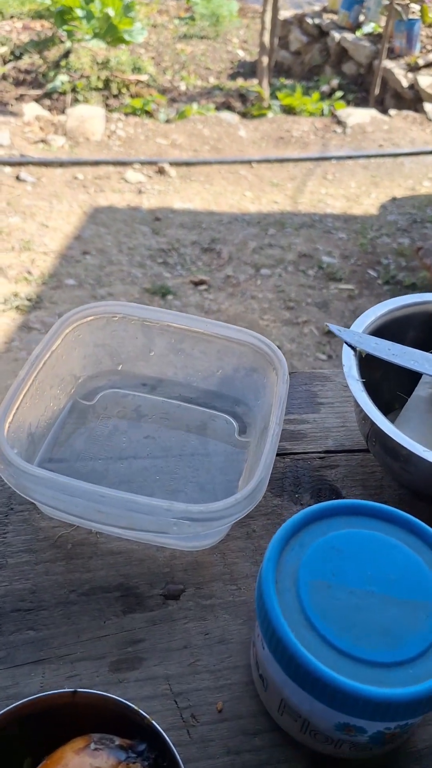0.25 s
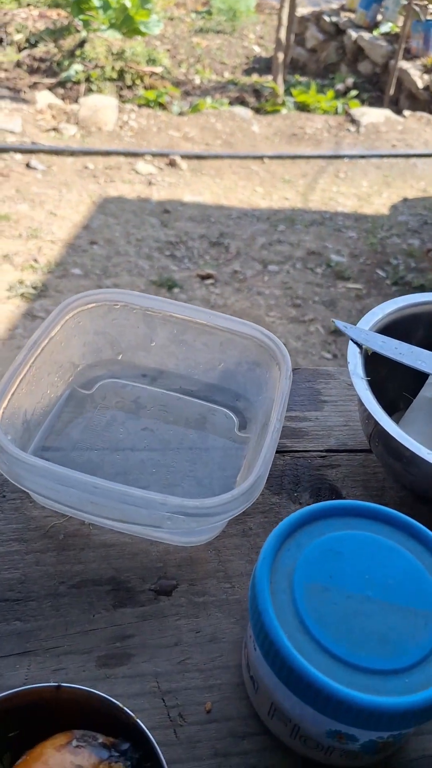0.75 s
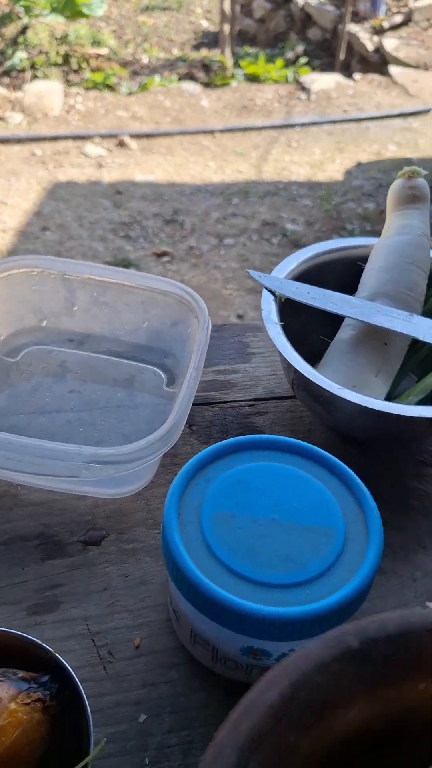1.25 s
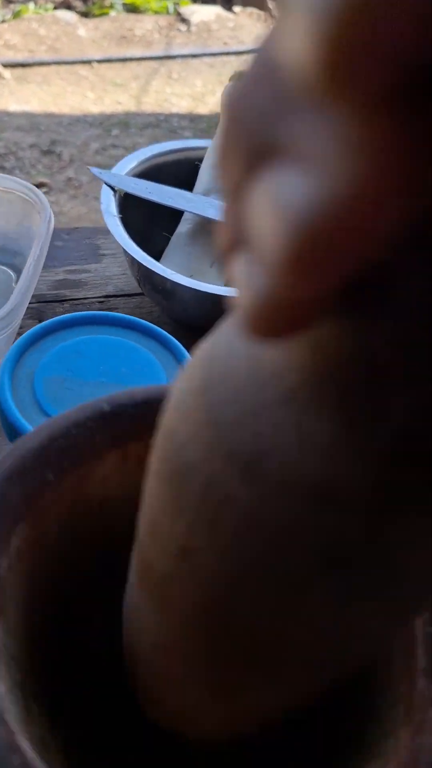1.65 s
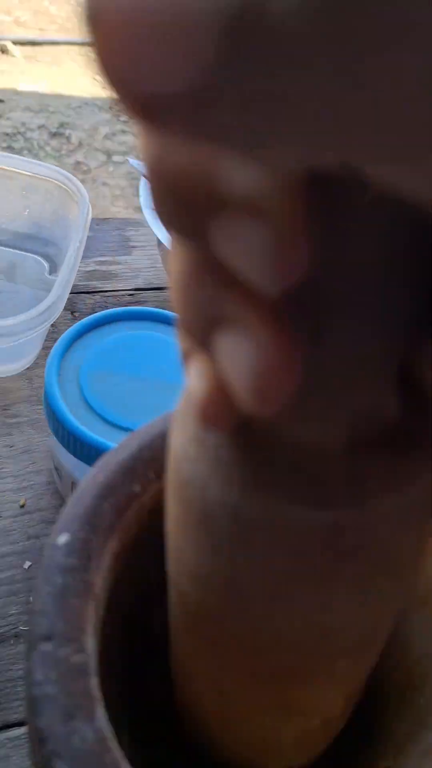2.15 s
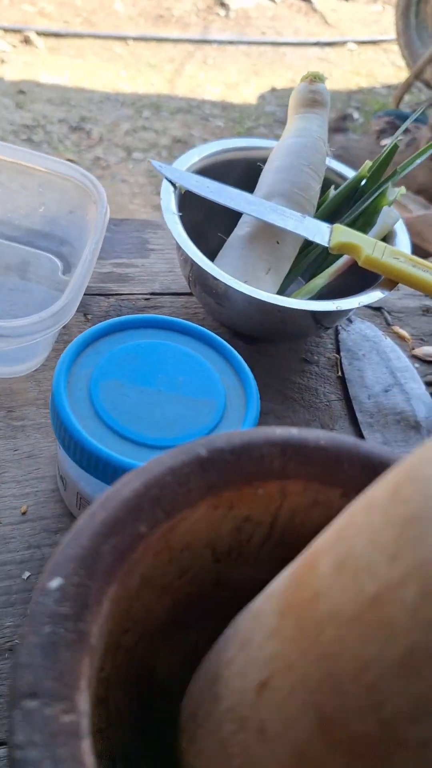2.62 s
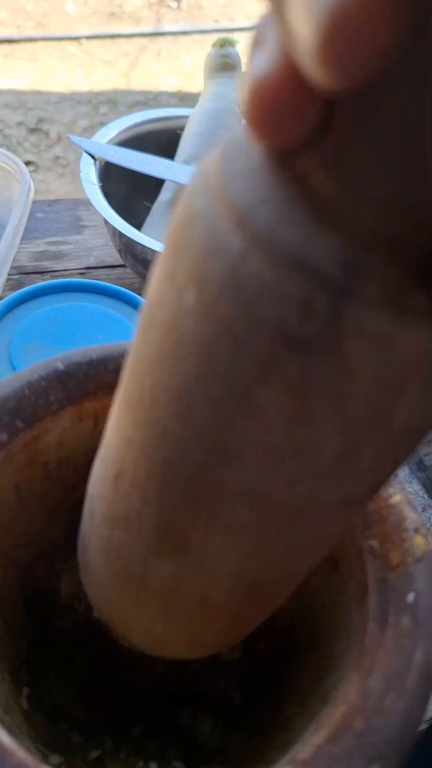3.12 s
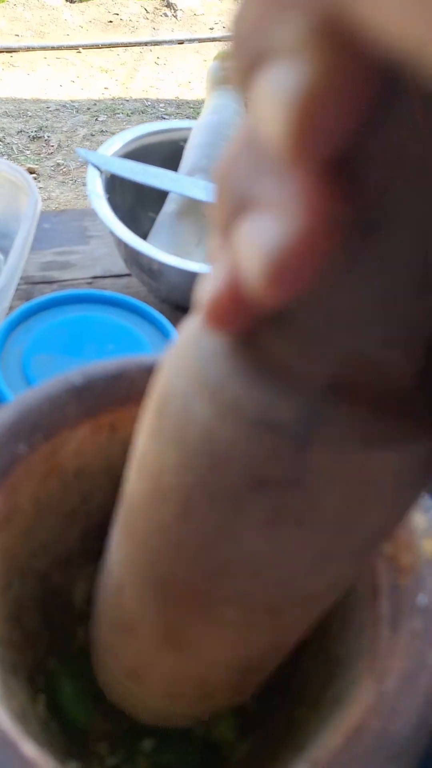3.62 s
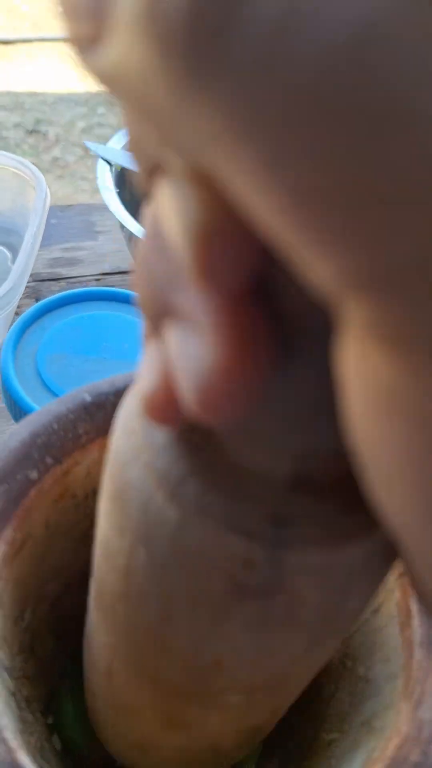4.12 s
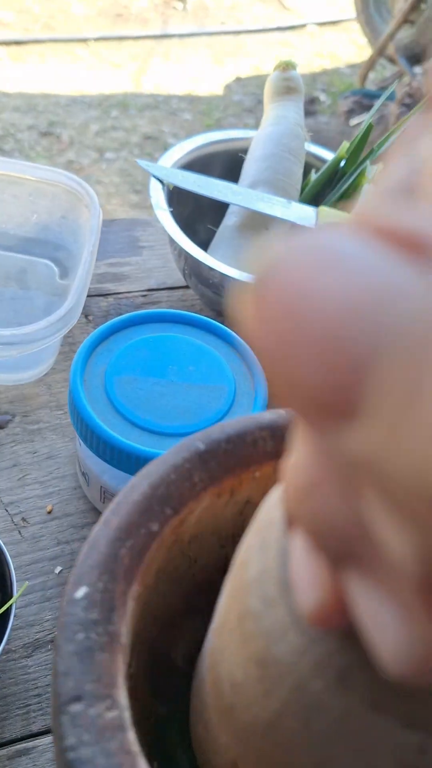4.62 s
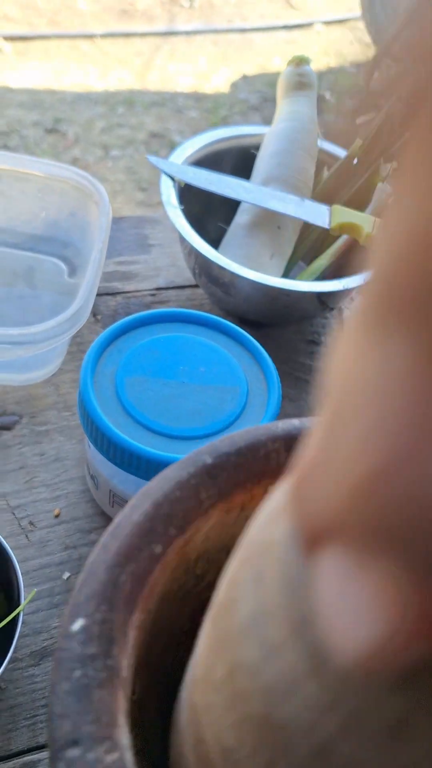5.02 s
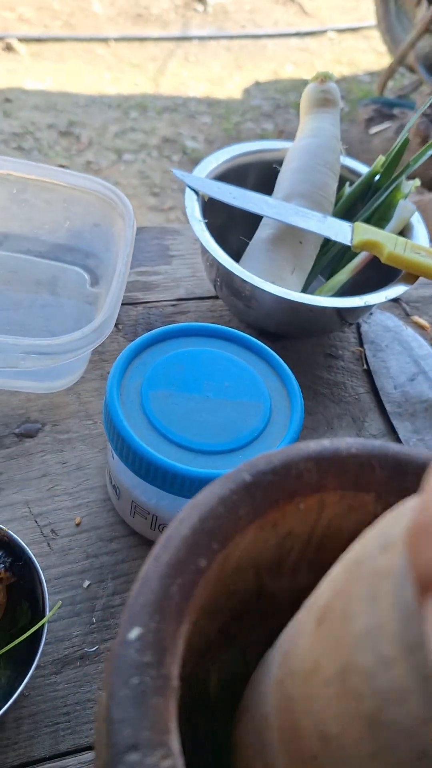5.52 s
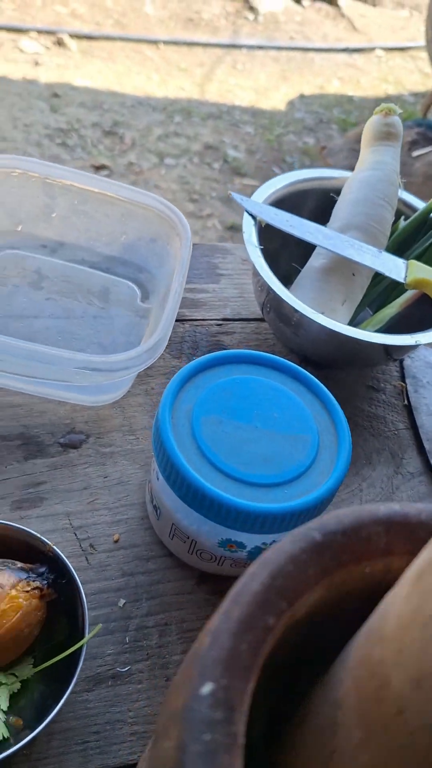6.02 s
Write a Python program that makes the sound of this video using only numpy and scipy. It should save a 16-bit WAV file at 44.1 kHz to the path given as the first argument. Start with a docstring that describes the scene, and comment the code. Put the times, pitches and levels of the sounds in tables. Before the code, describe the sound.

A wooden pestle pounds leaves in a wooden mortar on a plank table, steady crunchy thumps about every 0.4 seconds, outdoors, close up.

```python
"""A wooden pestle pounds leaves in a wooden mortar on a plank table under an outdoor shelter.
Each stroke crunches the leaves (sprays of noise grains) and thumps mortar and table (decaying wood modes).
Where the cushion is thin, wood meets wood: the hollow pops, and the shaft rings there and on wall or rim taps.
Dishes clatter, drags stick and slip, and the shelter answers with scattered echoes of filtered noise.
Behind lie outdoor rumble and hiss, and later a faint far whirr, all coloured noise."""
import sys
import numpy as np
from scipy import signal
from scipy.fft import rfft, irfft, next_fast_len
from scipy.io import wavfile

SR = 44100
rng = np.random.default_rng(int(sys.argv[2]) if len(sys.argv) > 2 else 0)


def int16_out(signal):
    """Quantize to a 16-bit WAV file."""
    q = np.round(np.clip(np.atleast_2d(signal).T, -1, 1) * 32767)
    wavfile.write(sys.argv[1], SR, q.astype(np.int16))


N = 275869
TIME = np.arange(N) / SR


def from_db(db):
    """Decibels to gain."""
    return 10 ** (np.asarray(db) / 20)


def at_hz(points, hz, column=1):
    """Read one column of a table along log frequency."""
    points = np.array(points)
    return np.interp(np.log(np.maximum(hz, 1)), np.log(points[:, 0]), points[:, column])


def add(track, s, sound):
    """Lay a stereo sound into the track at time s."""
    start = round(s * SR)
    track[:, start:start + sound.shape[1]] += sound[:, :N - start]


def noise(colour, alike):
    """Coloured stereo noise of rms 1 with a given left-right likeness."""
    size = next_fast_len(N, True)
    gain = from_db(at_hz(colour, np.fft.rfftfreq(size, 1 / SR)))
    spectra = rfft(rng.standard_normal((2, size))) * gain
    mid, side = irfft(spectra, size)[:, :N]
    alike = np.clip(alike, -1, 1)
    both = np.sqrt(1 + alike) * mid + np.sqrt(1 - alike) * side * np.array([[1], [-1]])
    return both / both.std()


def soften(ring, hardness_hz):
    """A soft contact rounds off the high modes: two equal one-pole low-passes."""
    r = np.exp(-2 * np.pi * hardness_hz / SR)
    return signal.lfilter([(1 - r) ** 2], [1, -2 * r, r * r], ring)


def strike(modes, spread, tilt_db=0, size=8000):
    """One blow rings every mode, each a little different in strength and pitch from blow to blow."""
    hz, db, t60, pan = np.array(modes).T[:, :, None]
    t, sides = TIME[:size], np.array([.5, -.5])[:, None, None]
    strength_db = 1.8 * rng.standard_normal(hz.shape)
    stretch = 1 + .01 * rng.standard_normal(hz.shape)
    # the tilt, in dB per octave, pivots on the strongest mode
    octaves = np.log2(hz / hz[db.argmax()])
    gain = from_db(db + strength_db + tilt_db * octaves + sides * pan)
    # neighbouring modes swing in opposite directions
    sign = (-1) ** np.arange(len(hz))[:, None]
    # high modes reach the two microphones further out of step
    phase = -sides * spread * np.sqrt(hz / hz.mean())
    cycles = hz * stretch * t
    # each ring builds up over its first cycle
    envelope = (1 - np.exp(-2 * cycles)) * from_db(-60 * t / t60)
    return (sign * gain * envelope * np.sin(2 * np.pi * cycles + phase)).sum(axis=1)


def flurry(envelope, clicks_per_s):
    """Tiny uneven contacts under an envelope; total energy 1."""
    size = len(envelope)
    hits = rng.random(size) < clicks_per_s / SR
    clicks = hits * rng.standard_normal(size) * envelope
    return clicks[None] / (np.linalg.norm(clicks) + 1e-9)


# colour of the low outdoor air: pitch_hz [Hz], level_db [dB per Hz]
RUMBLE = [(15, -23), (25, -3.5), (60, 0.5), (86, 2.5), (123, -0.5), (240, -11), (381, -3), (444, -11),
          (510, -11), (796, -27.5), (1160, -30), (1290, -19.5), (1500, -40), (1950, -70.5), (3300, -120)]
# colour of the thin outdoor air: pitch_hz [Hz], level_db [dB per Hz]
HISS = [(880, -39), (1500, -5.5), (1760, -12.5), (2100, -1.5), (2560, -10), (3220, -1), (5880, -1),
        (7610, 1), (9370, -5), (14600, -3), (16000, -27)]
# level of the outdoor air, before the overall rumble and hiss gains; the hiss dips after some loud knocks:
# time_s [s], rumble_db [dB], hiss_db [dB]
AIR = [(0.0, -50.5, -63), (0.31, -58.5, -63.5), (0.73, -58, -66.5), (1.71, -56.5, -64), (2.18, -57.5, -68),
       (2.39, -53, -62), (2.68, -59, -67.5), (2.98, -60, -65.5), (3.15, -62, -72), (5.4, -57, -69),
       (5.98, -57.5, -66.5), (6.26, -52.5, -66.5)]


def air(rumble_gain_db=0.66, hiss_gain_db=3.0):
    """A low outdoor rumble and a thin hiss, two bands of noise whose levels follow a table."""
    s, rumble_db, hiss_db = np.transpose(AIR)
    rumble_level = from_db(np.interp(TIME, s, rumble_db) + rumble_gain_db)
    hiss_level = from_db(np.interp(TIME, s, hiss_db) + hiss_gain_db)
    return rumble_level * noise(RUMBLE, alike=0.6) + hiss_level * noise(HISS, alike=0.15)


# strokes of the pestle: first_touch_s [s], crunch_db [dB], crunch_t60_s [s], sink_s [s], mortar_db [dB],
# hardness_hz [Hz], table_db [dB], hop_s [s], hop_db [dB], dishes_db [dB]
STROKES = [(.09, -12, 0.018, .002, -17, 350, -10, 0.029, -15.5, -35),
           (0.5363, -14, 0.021, .002, -6, 403, -8.5, .018, -18, -30),
           (.961, -16, 0.023, .002, -28, 300, -10.5, 0.033, -24.5, -32.5),
           (1.391, -27, .12, 0.006, -2, 344, -5.5, 0.029, -16.5, -22),
           (1.8054, -23.5, 0.03, 0.0016, -5.5, 302, -11, .015, -18, -31.5),
           (2.182, -33, 0.064, 0.0018, -14.5, 430, -15, .022, -20, -35),
           (2.99, -23.5, 0.013, 0.0019, -10, 219.3, -22.5, 0.019, -25.5, -40.5),
           (3.386, -20.5, 0.017, 0.0063, -17.5, 452, -12, 0.022, -32.5, -41.5),
           (3.76, -24, 0.026, 0.0014, -10, 550, -12, 0.036, -21.5, -29),
           (4.163, -26, 0.074, .002, -18, 496, -16.5, .016, -15, -32),
           (4.678, -20, 0.042, 0.0052, -25.5, 350, -22.5, 0.045, -16.5, -27),
           (5.152, -26.5, 0.044, .013, -21, 300, -13.5, .038, -19.5, -29.5),
           (5.582, -28.5, 0.056, .015, -24, 450, -18.5, 0.056, -24, -39.5),
           (5.986, -22.5, 0.049, 0.0019, -15.5, 450, -11, 0.039, -13, -18)]
# single stalks snapping: start_s [s], level_db [dB]
SNAPS = [(1.822, -28.5), (4.424, -41.5), (5.167, -25), (5.594, -24), (5.657, -35.5), (5.727, -39.5)]
SNAP_T60_S = 0.031
# the pestle peels off the pulp; level against the stroke's crunch
PEEL_DELAY_S, PEEL_DB, PEEL_T60_S = .18, -37, 0.13
# grit under bare wood: level against the hollow in a knock, against the shaft in a tap
KNOCK_GRIT_DB, TAP_GRIT_DB, GRIT_T60_S = -32.5, -9, .016
# pulp smeared by a drag: level against the drag, t60 in drag lengths
SMEAR_DB, SMEAR_LENGTHS = -18, 3.7


def crunches():
    """Leaves give way at each touch, lift and drag, and grit cracks under bare wood: (s, dB, t60 s)."""
    rows = []
    for s, db, t60, *_ in STROKES:
        rows.append((s, db, t60))
        rows.append((s + PEEL_DELAY_S, db + PEEL_DB, PEEL_T60_S))
    rows += [(s, hollow_db + KNOCK_GRIT_DB, GRIT_T60_S) for s, hollow_db, _, _ in KNOCKS]
    rows += [(s, shaft_db + TAP_GRIT_DB, GRIT_T60_S) for s, shaft_db, _, _ in TAPS]
    rows += [(s, db + SMEAR_DB, length_s * SMEAR_LENGTHS) for s, length_s, db in SCUFFS]
    return rows + [(s, db, SNAP_T60_S) for s, db in SNAPS]


# colour of crushed leaves: pitch_hz [Hz], level_db [dB per Hz]
CRUNCH_COLOUR = [(300, -12), (1000, -1.5), (1800, -8.5), (2700, -4.5), (3550, 1), (4500, 2.5), (6000, 0.5),
                 (7800, 1.5), (10000, -5.5), (15500, -4.5)]


def leaves(rise_s=0.00069, grains_per_s=1800, clumps_per_s=450, alike=-0.18,
           wall_echo=.6, wall_lag_s=.0007):
    """Cells burst in a dense spray of grains and coarser clumps that dies as the leaves pack down."""
    out, age, hiss = np.zeros((2, N)), TIME[:N // 10], noise(CRUNCH_COLOUR, alike)
    size = len(age)
    for s, db, t60 in crunches():
        squeeze = from_db(db - 60 * age / t60) * (1 - np.exp(-age / rise_s))
        grain = np.interp(age * grains_per_s, np.arange(size), rng.standard_normal(size))
        clump = np.interp(age * clumps_per_s, np.arange(size), rng.standard_normal(size))
        spray = squeeze * from_db(3.5 * (grain + clump))
        # the stroke sets the energy, chance only shares it out among the grains
        spray *= np.linalg.norm(squeeze) / np.linalg.norm(spray) / np.hypot(1, wall_echo)
        start = rng.integers(N - size)
        burst = hiss[:, start:start + size] * spray
        add(out, s, burst)
        # the mortar's wall throws each burst back from a different distance
        add(out, s + wall_lag_s * rng.uniform(.5, 2), wall_echo * burst)
    return out


# the mortar rocks on the planks between strokes: start_s [s], table_db [dB], hardness_hz [Hz]
ROCKS = [(2.416, -34, 202), (2.527, -35.5, 200), (3.549, -29.5, 202), (3.579, -35.5, 250),
         (4.951, -40, 180), (5.242, -27.5, 1100), (5.289, -32.5, 200), (5.342, -29, 550), (5.386, -31, 220),
         (6.236, -33, 220)]
ROCK_MORTAR_DB = -3.5   # against the table
# after a landing the mortar hops and drops back twice, wood on planks, each hop shorter and weaker;
# HOP_HARDER multiplies the landing's hardness, HOP_TABLE_DB is against the mortar
HOP_SHRINK, HOP_LOSS_DB, HOP_HARDER, HOP_TABLE_DB = .8, 8.5, 1.4, -7


def blows():
    """Every cushioned push on the mortar (landing, two hops, rocking): (s, mortar dB, hardness Hz, table dB)."""
    rows = []
    for s, _, _, sink_s, db, hardness_hz, table_db, hop_s, hop_db, _ in STROKES:
        s = s + sink_s
        rows.append((s, db, hardness_hz, table_db))
        for k in range(2):
            s = s + hop_s * HOP_SHRINK ** k
            db = hop_db - HOP_LOSS_DB * k
            rows.append((s, db, hardness_hz * HOP_HARDER, db + HOP_TABLE_DB))
    return rows + [(s, db + ROCK_MORTAR_DB, hardness_hz, db) for s, db, hardness_hz in ROCKS]


# wood modes of the mortar: pitch_hz [Hz], level_db [dB], t60_s [s], left_over_right_db [dB]
MORTAR = [(224, -9.5, 0.072, -1.5), (281, -3.5, 0.08, 2.5), (318.5, -14, 0.16, 1), (352, -7.5, 0.1, -4),
          (398.9, -14, 0.11, 0.5), (449.4, -9.5, 0.15, 0), (537, -16, .05, -13), (605.5, -14, 0.074, 9.5),
          (688, -18.5, 0.066, 18), (760.6, -16, 0.13, -5), (842, -5, 0.033, -2.5), (1036, -11, 0.092, 10),
          (1105, -12, 0.06, -6), (1383, -15, 0.051, -4)]
# short resonances of its hollow: pitch_hz [Hz], level_db [dB], t60_s [s], left_over_right_db [dB]
HOLLOW = [(725, -11, 0.02, 4.5), (1001.5, 5, 0.0091, 2), (1395, -16, 0.0112, 1.5), (1807, -15, 0.015, 1.5)]
# the tip gets through to the bare bottom:
# start_s [s], hollow_db [dB], hollow_tilt_db [dB/octave], mortar_db [dB]
KNOCKS = [(0.9686, -10.5, -3.5, -12.5), (2.9905, -1, 2.5, -14.5), (3.386, -4, -3.5, -9.5),
          (3.793, -10.5, 10.5, -15), (4.6947, -2, -2, -17), (5.1768, -7, 0, -15), (5.9965, -12, -16, -18)]
TAP_MORTAR_DB = -5   # against the hollow


def mortar(bare_wood_hz=2200):
    """The wood rings under each blow; a bare contact also makes the hollow pop."""
    out = np.zeros((2, N))
    for s, db, hardness_hz, _ in blows():
        add(out, s, from_db(db) * soften(strike(MORTAR, spread=0.24), hardness_hz))
    taps = [(s, hollow_db, 0, hollow_db + TAP_MORTAR_DB) for s, _, _, hollow_db in TAPS]
    for s, hollow_db, tilt_db, db in list(KNOCKS) + taps:
        add(out, s, from_db(db) * soften(strike(MORTAR, spread=0.79), bare_wood_hz))
        add(out, s, from_db(hollow_db) * strike(HOLLOW, spread=0.57, tilt_db=tilt_db))
    return out


# modes of the plank table: pitch_hz [Hz], level_db [dB], t60_s [s], left_over_right_db [dB]
TABLE = [(53.7, -12.5, 0.19, -1.5), (75.6, -6, 0.18, 1.5), (108, 0, 0.048, 1.5), (196.3, -2, 0.041, -0.5)]


def table(knock_share_db=-7):
    """The planks take the weight of each blow, knock and tap, ringing in low modes."""
    out = np.zeros((2, N))
    pushes = [(s, db) for s, _, _, db in blows()]
    # against the mortar in a knock, against the hollow in a tap
    pushes += [(s, mortar_db + knock_share_db) for s, _, _, mortar_db in KNOCKS]
    pushes += [(s, hollow_db + knock_share_db) for s, _, _, hollow_db in TAPS]
    for s, db in pushes:
        add(out, s, from_db(db) * soften(strike(TABLE, spread=.5), hardness_hz=500))
    return out


# reverberation of the shelter: pitch_hz [Hz], level_db [dB], t60_s [s]
SHELTER = [(150, -10.5, 0.3), (385, -4, 0.12), (1000, -9.5, 0.11), (2000, -3.5, 0.092), (3400, -5.5, 0.14),
           (6000, -12, 0.12), (15000, -12, .12)]


def shelter(dry, first_echo_s=0.0021, alike_below_hz=700, size=16000):
    """Scattered echoes from table, ground and roof, dying band by band and wider in the treble."""
    t, hz = TIME[:size], np.fft.rfftfreq(size, 1 / SR)
    mid, side = rfft(rng.standard_normal((2, size)))
    white = mid + side * hz / (hz + alike_below_hz) * np.array([[1], [-1]])
    # silent up to the first echo, full at twice that time
    onset = np.clip(t / first_echo_s - 1, 0, 1)
    edges, echoes = np.geomspace(100, SR / 2, 14), 0
    for low, high in zip(edges, edges[1:]):
        centre = np.sqrt(low * high)
        fade = from_db(-60 * t / at_hz(SHELTER, centre, column=2))
        band = irfft(white * ((hz >= low) & (hz < high)), size) * fade * onset
        # each band's energy follows its width and its level in the table
        energy = np.mean(np.sum(band ** 2, axis=1))
        level = from_db(at_hz(SHELTER, centre))
        echoes = echoes + band * level * np.sqrt(2 * (high - low) / SR / energy)
    return signal.fftconvolve(dry, echoes, axes=1)[:, :N]


# modes of the bowls and tubs: pitch_hz [Hz], level_db [dB], t60_s [s], left_over_right_db [dB]
DISHES = [(876, -1.5, 0.022, 4), (1067, -3.5, 0.036, -0.5), (1177, -3, 0.02, 1.5), (1740, -11, 0.015, 0),
          (2560, -10, 0.02, 0), (2823, -14.5, .022, -2.5), (3160, -9, 0.011, 1.5),
          (3850, -8.5, 0.0066, -2.5), (5200, -5, 0.005, 3.5), (7600, -12.5, .005, -3)]
DISH_DELAY_S = .02   # the dishes come down this long after a landing


def dishes(clicks_per_s=300, shake_s=0.013, size=5000):
    """Bowls and tubs hop on the planks after a landing: a flurry of contacts rings their modes."""
    out, age = np.zeros((2, N)), TIME[:size] / shake_s
    for s, _, _, sink_s, *_, db in STROKES:
        contacts = flurry(age * np.exp(-age), clicks_per_s)
        clatter = signal.fftconvolve(contacts, strike(DISHES, spread=1.8), axes=1)
        add(out, s + sink_s + DISH_DELAY_S, from_db(db) * clatter)
    return out


# bending modes of the pestle: pitch_hz [Hz], level_db [dB], t60_s [s], left_over_right_db [dB]
PESTLE = [(1539.5, 0.5, 0.063, -8), (1710, -2, 0.02, 15), (2030, -8.5, 0.038, -6),
          (2825, -11.5, 0.019, 3.5), (3570, -3.5, 0.024, -5.5), (4743, -19.5, 0.013, 0)]
# the shaft hits the wall or rim: start_s [s], shaft_db [dB], shaft_tilt_db [dB/octave], hollow_db [dB]
TAPS = [(1.8228, -44, 16.5, -32), (2.1846, -48, 20.5, -27), (2.333, -33.5, 0, -18.5), (3.52, -43, 14, -26),
        (3.7933, -34.5, 13, -33), (4.376, -35, -4.5, -29.5), (4.935, -32.5, -7.5, -28),
        (5.1429, -19, -10, -17.5), (5.1773, -24.5, -9, -34.5), (5.988, -38, 16.5, -32)]
KNOCK_SHAFT_DB = -33.5   # against the hollow


def pestle(spread=1.1):
    """A knock sets the shaft bending; where it is touched decides between its low and high modes."""
    out = np.zeros((2, N))
    for s, db, tilt_db, _ in TAPS:
        add(out, s, from_db(db) * strike(PESTLE, spread, tilt_db=tilt_db))
    for s, hollow_db, _, _ in KNOCKS:
        add(out, s, from_db(hollow_db + KNOCK_SHAFT_DB) * strike(PESTLE, spread, tilt_db=5))
    return out


# the pestle dragging round the bowl: start_s [s], length_s [s], level_db [dB]
SCUFFS = [(2.393, 0.25, -40), (3.555, 0.039, -36), (5.339, 0.077, -40.5), (5.593, 0.083, -27.5)]


def scuffs(slips_per_s=500, hardness_hz=500):
    """Dragged over the pulp, the pestle sticks and slips and the wood mutters."""
    out = np.zeros((2, N))
    for s, length_s, db in SCUFFS:
        slips = flurry(np.sqrt(np.hanning(round(length_s * SR))), slips_per_s)
        wood = soften(strike(MORTAR, spread=0.59), hardness_hz)
        add(out, s, from_db(db) * signal.fftconvolve(slips, wood, axes=1))
    return out


# colour of the far whirr: pitch_hz [Hz], level_db [dB per Hz]
WHIRR_COLOUR = [(1400, -27), (1850, -8.5), (2120, -4), (2400, -9.5), (3000, -36)]
# level of the far whirr: time_s [s], level_db [dB]
WHIRR = [(4.55, -100.5), (4.682, -64.5), (5.001, -72), (5.448, -65.5), (5.58, -76), (5.699, -77)]


def whirr():
    """A narrow band of noise swells far off for about a second, then holds at a fainter level."""
    s, db = np.transpose(WHIRR)
    return from_db(np.interp(TIME, s, db)) * noise(WHIRR_COLOUR, alike=0.22)


def scene(shaft_echo_db=-4):
    """The pounding, its echoes, the air and the whirr."""
    bowl = mortar() + table() + dishes() + scuffs() + leaves()
    shaft = pestle()
    # the shaft is closest to the microphone, so it sounds drier
    echoes = shelter(bowl + from_db(shaft_echo_db) * shaft)
    return bowl + shaft + echoes + air() + whirr()


def record(dry, low_cut_hz=42, top_cut_hz=16000):
    """The microphone drops the deep bass, any peaks past full scale overload, the top is cut."""
    low_cut = signal.butter(2, low_cut_hz, "high", fs=SR, output="sos")
    top_cut = signal.ellip(10, .1, 90, top_cut_hz, fs=SR, output="sos")
    thin = signal.sosfilt(low_cut, dry)
    return signal.sosfilt(top_cut, np.clip(thin, -1, 1))


dry = scene()
out = record(dry)
int16_out(out)
```